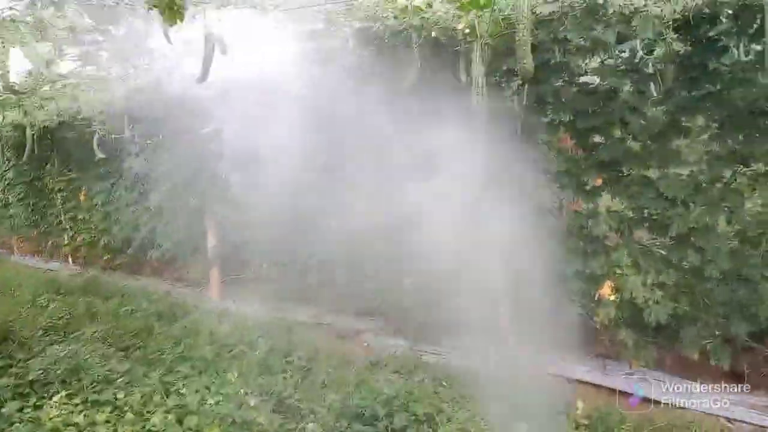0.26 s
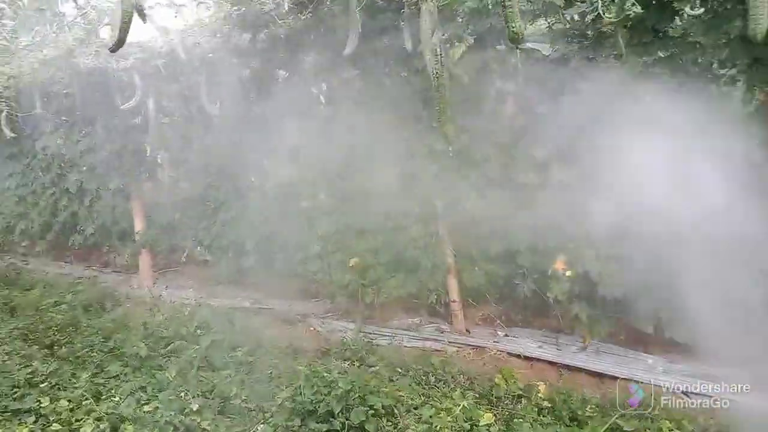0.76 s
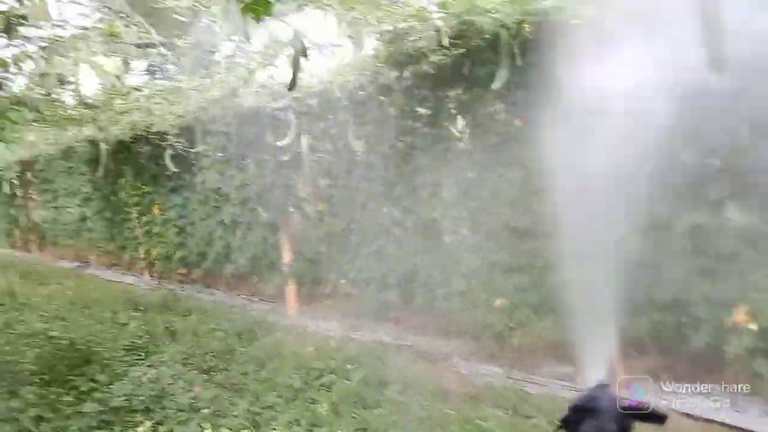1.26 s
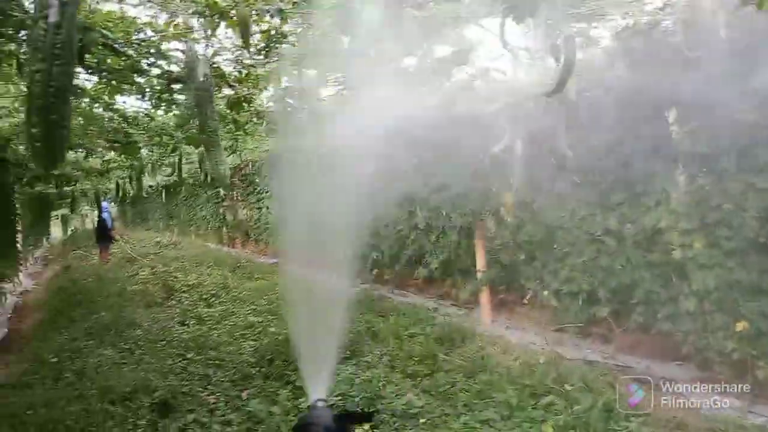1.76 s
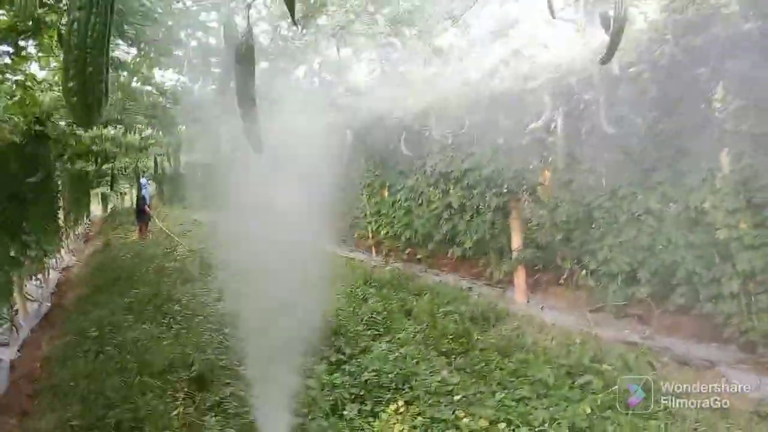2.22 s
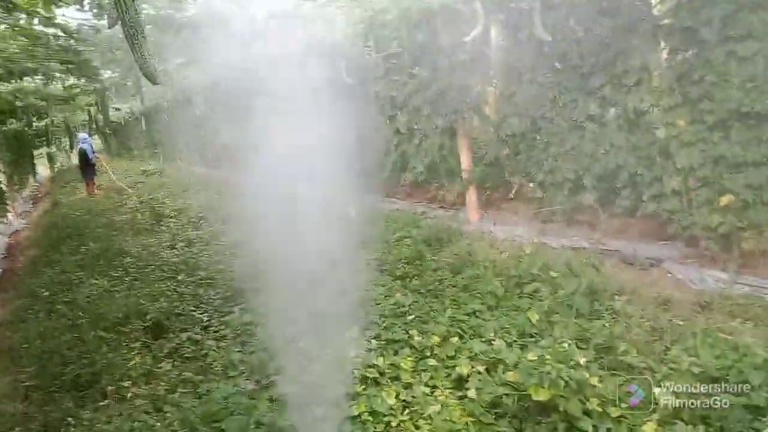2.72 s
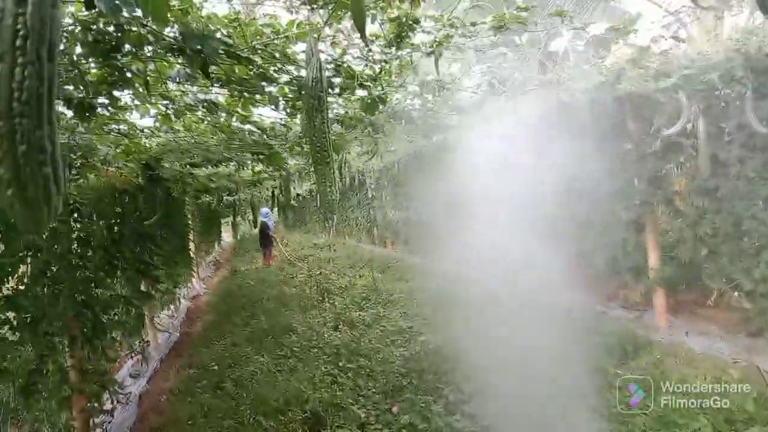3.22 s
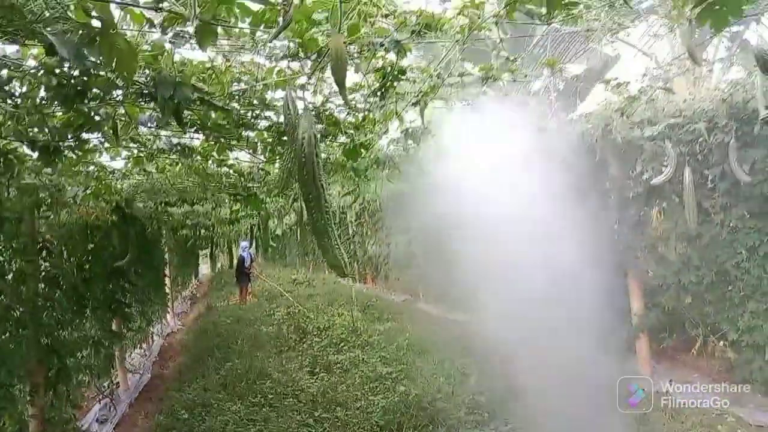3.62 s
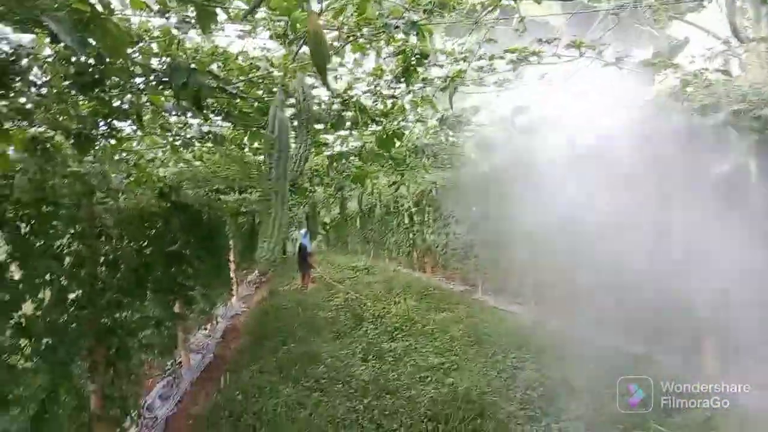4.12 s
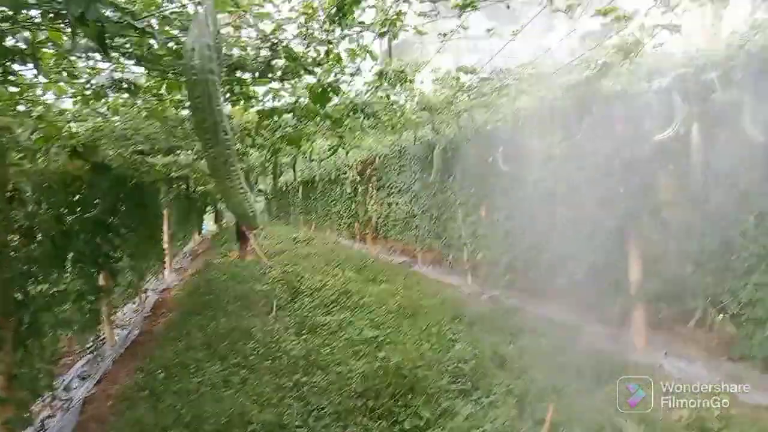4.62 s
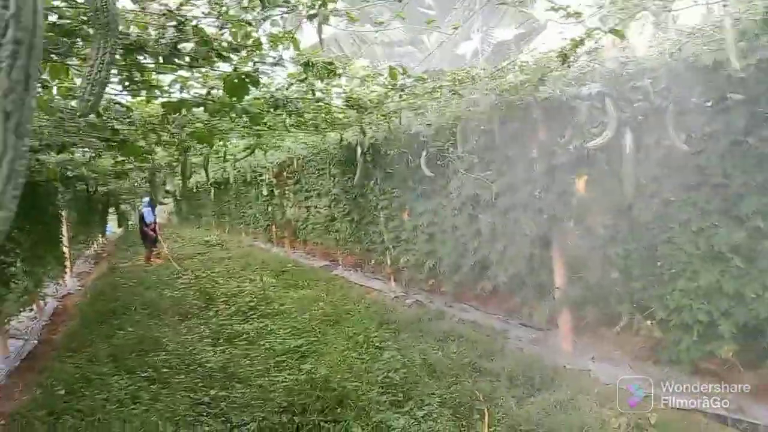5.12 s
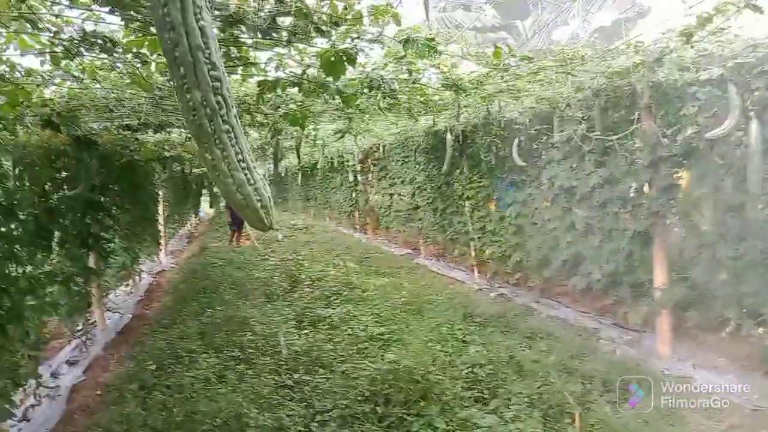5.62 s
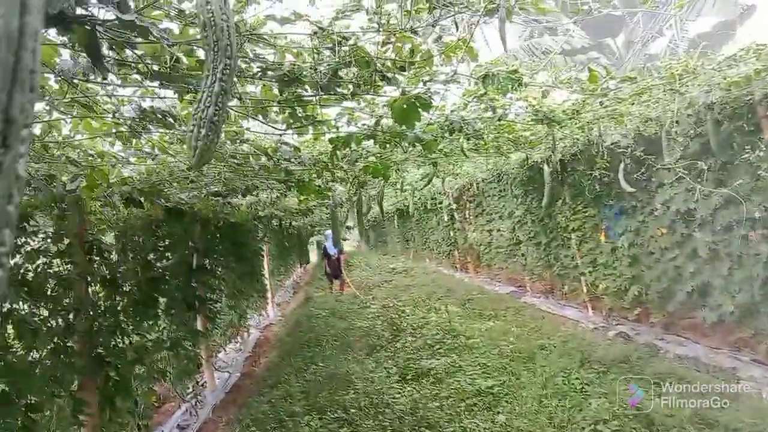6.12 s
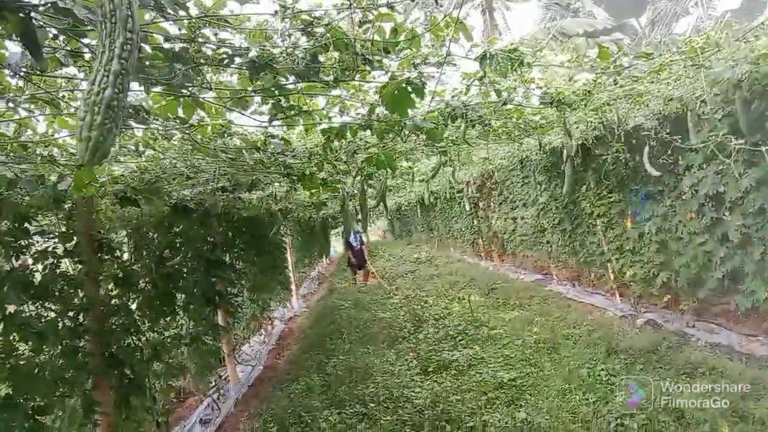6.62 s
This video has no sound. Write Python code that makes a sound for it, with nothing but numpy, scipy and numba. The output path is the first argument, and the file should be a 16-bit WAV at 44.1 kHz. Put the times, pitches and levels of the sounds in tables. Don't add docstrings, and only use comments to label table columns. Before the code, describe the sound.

A continuous jet of fine mist, very near the microphone, starts strong and peaks just after one second, drops, partly returns, then weakens after four seconds. Its airy hiss has a rough fast throb and a moving hollow tone. Beneath it are soft leaf patter, short watery plops and low wind thuds. The place is open and dry, without echo.

```python
import sys
import numpy as np
from scipy import signal
from scipy.fft import rfft, irfft
from scipy.io import wavfile
from scipy.ndimage import uniform_filter1d
from numba import njit

SR = 44100
rng = np.random.default_rng(int(sys.argv[2]) if len(sys.argv) > 2 else 0)


def magnitude_from_level(level_db):
    exponent = np.asarray(level_db, float) / 20
    return 10 ** exponent


def output_pcm(signal):
    pcm = np.clip(np.atleast_2d(signal).T, -1, 1) * 32767
    wavfile.write(sys.argv[1], SR, np.round(pcm).astype(np.int16))


N = 302967
TIME = np.arange(N) / SR
FREQ = np.arange(N // 2 + 1) * SR / N + 1


def unit(x):
    return x / np.sqrt(np.mean(x ** 2))


def curves(rows):
    s, *columns = np.transpose(rows)
    return [np.interp(TIME, s, column) for column in columns]


def colour(x, points):
    hz, db = np.transpose(points)
    gain_db = np.interp(np.log(FREQ), np.log(hz), db, left=-80, right=-80)
    return unit(irfft(rfft(x) * magnitude_from_level(gain_db), N))


def walk(rate_hz):
    hold = int(SR / rate_hz)
    steps = np.repeat(rng.standard_normal(N // hold + 1), hold)
    slewed = uniform_filter1d(uniform_filter1d(steps, hold), hold)
    return unit(slewed[:N])


def swells(peak_s, size, rise_s, fall_s, linger):
    coarse_s = TIME[::32]
    t = coarse_s - peak_s[:, None]
    rise = t / np.reshape(rise_s, (-1, 1))
    fall = -np.abs(t / np.reshape(fall_s, (-1, 1))) ** linger
    humps = size[:, None] * np.exp(np.where(t < 0, rise, fall))
    return np.interp(TIME, coarse_s, humps.sum(axis=0))


@njit
def moving_band(x, hz, k):
    band, high = np.empty(len(x)), np.empty(len(x))
    b, l = 0., 0.
    for i in range(len(x)):
        g = np.tan(np.pi * hz[i] / SR)
        v = (b + g * (x[i] - l)) / (1 + g * (g + k))
        band[i] = k * v
        high[i] = x[i] - k * v - l - g * v
        b, l = 2 * v - b, l + 2 * g * v
    return band, high


def notch(x, hz, depth_db, k, wander):
    tremor = 0.6 * walk(130) + 0.6 * walk(24)
    centre_hz = np.clip(hz * (1 + wander * tremor), 100, 0.45 * SR)
    kept = magnitude_from_level(-0.8 * np.abs(depth_db) * (1 + 0.1 * walk(30)))
    for width in (k, 0.65 * k):
        x = x - (1 - kept) * moving_band(x, centre_hz, width)[0]
    return x


def jet():
    heard = path_notches(spray())
    heard = rumble_filter(edge_resonance(heard))
    return aimed(heard)


def spray():
    # frequency in Hz, level in dB per Hz.
    jet_colour = [(500, -60), (1000, -13.5), (1450, -10), (2200, -7.5), (3300, -2.5), (4200, -13),
                  (5000, -7), (5750, -3), (6800, -8), (7700, -18), (9300, -20), (11000, -16.5),
                  (13000, -13.5), (15500, -5.5)]
    size_db = 3.0 * np.minimum(rng.exponential(size=N), 4)
    bursts = (rng.random(N) < 0.02) * magnitude_from_level(size_db) * np.sign(rng.standard_normal(N))
    hiss = rng.standard_normal(N) * magnitude_from_level(0.4 * walk(150))
    return colour(hiss + magnitude_from_level(-8) * unit(bursts), jet_colour)


def path_notches(x):
    # time in seconds, centre in Hz, depth in dB.
    first_notch = [(0, 3020, 24), (.18, 3400, 12), (.3, 3670, 8), (.64, 4230, 11.5), (.88, 4410, 10),
                   (1.08, 4700, 10), (1.29, 3790, 13), (1.45, 3700, 14), (1.63, 3440, 18), (1.9, 3190, 18),
                   (2.1, 3100, 12), (2.26, 3260, 14), (2.56, 3220, 22), (2.95, 3400, 11), (3.25, 3920, 8.5),
                   (4.0, 3930, 10.5), (4.22, 4440, 10), (4.3, 4450, 4)]
    valley = [(0, 8300, 1.5), (.25, 8000, 6.5), (1.0, 8650, 5.5), (1.45, 8150, 5), (1.7, 9600, 3.5),
              (2.2, 9700, 2), (2.4, 9700, 2.5), (2.95, 8060, 3), (3.15, 8500, 7), (4.3, 8570, 4.5),
              (4.5, 9400, 3.5), (4.75, 8800, 1), (5.2, 8300, -0.5), (5.36, 9200, 3), (6.2, 8900, 4.5),
              (6.87, 8540, 3.5)]
    third_notch = [(0, 11700, 2.5), (.35, 12600, 6), (.7, 12500, 7), (.9, 12600, -3.5), (1.4, 11200, 5.5),
                   (1.9, 11700, -1), (2.85, 11500, 3.5), (3.2, 13500, 5.5), (3.5, 13200, 10),
                   (4.05, 13500, 4), (4.17, 15200, 8), (4.35, 14000, .3), (4.6, 12500, -0.5),
                   (5.0, 12500, .1), (5.35, 12600, 4), (5.7, 12100, 2), (6.1, 12100, 5), (6.87, 11900, 2)]
    upper_notch = [(0, 14000, 6), (.25, 14300, 3.5), (.7, 14600, 8), (.87, 15400, 11), (1.1, 15500, 5.5),
                   (1.7, 14700, 3), (1.95, 13800, 0), (2.3, 14300, 3), (2.95, 14500, 4), (3.12, 14500, 0),
                   (6.87, 14500, 2.5)]
    first_hz, first_db = curves(first_notch)
    long_way = np.clip((3700 - first_hz) / 550, 0, 1)
    x = notch(x, first_hz, first_db, 0.56, 0.018)
    x = notch(x, 2890 + 0.97 * first_hz, 5.5 * long_way, 0.3, 0.01)
    x = notch(x, np.full(N, 8000.0), 2 * long_way, 0.2, 0.01)
    x = notch(x, *curves(valley), 0.38, 0.01)
    x = notch(x, *curves(third_notch), 0.3, 0.015)
    return notch(x, *curves(upper_notch), 0.35, 0.01)


def edge_resonance(x):
    # time in seconds, centre in Hz, gain in dB.
    rim = [(0, 1520, 3.5), (1.2, 1550, -0.3), (1.6, 1510, 3.5), (2.8, 1530, 4), (3.2, 1300, 3),
           (4.0, 1320, 2.5), (4.4, 1500, 0.3), (5.5, 1500, -3), (6.87, 1340, 1.5)]
    rim_hz, rim_db = curves(rim)
    return x + (magnitude_from_level(rim_db) - 1) * moving_band(x, rim_hz, 0.46)[0]


def rumble_filter(x):
    # time in seconds, corner in Hz.
    low_edge = [(0, 1200), (.7, 1120), (1.35, 1090), (1.85, 1170), (2.85, 1240), (3.1, 1097), (3.95, 1105),
                (4.2, 1206), (4.7, 1300), (4.9, 1220), (5.35, 1165), (5.75, 1210), (6.3, 1200),
                (6.87, 1095)]
    corner_hz = curves(low_edge)[0] * (1 + 0.03 * walk(9.7))
    for k in (1.37, 1.21, 0.81, 0.32):
        x = moving_band(x, 1.085 * corner_hz, k)[1]
    return x - 0.79 * moving_band(x, 0.95 * corner_hz, 0.28)[0]


def aimed(x):
    edges_hz = [4035, 7260, 10900]
    # level over nearness in dB, dB per dB of facing, dB per dB of aim, share of a shade.
    regions = [
        (-0.21, 0.06, 0.31, 0.97),
        (7.5, 0.8, 0, 0.84),
        (-6.5, .1, -0.2, 0.62),
        (1.5, 0.53, 1.5, 1.3),
    ]
    # time in seconds, strokes per second, throb share 0-1.
    pump = [(0.0, 33.93, 0.1), (0.62, 36.63, 0.13), (1.25, 34.95, 0.13), (1.87, 36.45, 0.05),
            (2.5, 35.23, 0.07), (3.12, 35.04, 0.14), (3.75, 35.77, 0.09), (4.37, 35.54, 0.11),
            (5.0, 36.56, 0.08), (5.62, 36.94, 0.16), (6.25, 37.14, 0.15), (6.87, 37.27, 0.14)]
    throb_shares = [1.22, 1.05, 0.27, 0.42]
    rate_hz, throb = curves(pump)
    stroke = np.cos(2 * np.pi * (0.14 + np.cumsum(rate_hz) / SR))
    near_db, *turns_db = gun()
    below = [0] + [1 / (1 + (FREQ / hz) ** 12) for hz in edges_hz] + [1]
    spectrum = rfft(x)
    out = np.zeros(N)
    for i, (over_db, *gains) in enumerate(regions):
        region = unit(irfft(spectrum * (below[i + 1] - below[i]), N))
        level_db = near_db + over_db + np.dot(gains, turns_db) + 0.64 * walk(25.01)
        out += region * magnitude_from_level(level_db) * (1 + 1.34 * throb_shares[i] * throb * stroke)
    return out


def gun():
    # time in seconds, nearness in dB, facing the port in dB, aim along the phone in dB.
    sweep = [(0, -30, -0.5, -2.5), (.36, -29.5, 3.5, 0.5), (.8, -29, -0.4, 0.5), (1.1, -28, -1.1, 1.5),
             (1.3, -27.5, -1.1, 1.2), (1.42, -32, -2, 1), (1.75, -35.3, -1.5, -3), (1.96, -32.5, -.4, -2.5),
             (2.94, -30.5, 0.3, -1.5), (3.1, -30.5, 1.3, -0.2), (3.55, -30.5, 3, -0.6),
             (4.06, -30.5, 1.1, -0.5), (4.3, -31, -3, 4.4), (4.62, -32.5, 1, -3.5), (5.05, -34, 4.5, 2),
             (5.68, -35, -2.5, 4), (6.05, -35, 0.1, 2.5), (6.87, -35.5, -0.2, 3.5)]
    # time in seconds, loss in dB, recovery in seconds.
    shades = [
        (1.35, 2, 0.045),
        (4.395, 8.5, 0.083),
        (5.262, 2.5, 0.23),
    ]
    s, loss_db, back_s = np.transpose(shades)
    shade_db = -swells(s, loss_db, 0.0093, back_s, linger=2.05)
    return curves(sweep) + [shade_db]


def spits():
    # time in seconds, peak in dB.
    snaps = [
        (4.4005, -6),
        (4.4295, -11),
    ]
    out = np.zeros(N)
    for s, db in snaps:
        t = TIME - s
        out += magnitude_from_level(db) * np.exp(-(t / 0.00008) ** 2) * np.sin(2 * np.pi * 13500 * t)
    return out


def leaves(level_db):
    # frequency in Hz, level in dB per Hz.
    leaf_colour = [(120, -17), (200, -4.5), (493, -9), (828, -1), (1000, 0), (1300, 1), (2200, -120)]
    patter = rng.standard_normal(N) * magnitude_from_level(1.6 * walk(40))
    return colour(patter, leaf_colour) * magnitude_from_level(level_db + 2.5)


def plops():
    # time in seconds, pitch in Hz, level in dB.
    drops = [(0.051, 1063, -47), (.2, 698, -49.5), (.32, 680, -49), (0.645, 957, -49), (.82, 720, -52),
             (0.969, 327, -49.5), (1.1, 404, -58), (1.11, 950, -46), (1.23, 550, -49), (1.259, 965, -49),
             (1.278, 1086, -42), (1.3, 665, -45), (1.37, 790, -50), (1.6, 725, -51.5), (1.78, 706, -52.5),
             (2.43, 990, -46), (2.75, 950, -45), (2.84, 916, -47), (3.001, 1170, -41.5), (3.19, 1178, -41),
             (3.359, 877, -54), (3.87, 464, -57), (4.87, 1273, -45), (5.159, 355, -59), (5.6, 980, -53),
             (6.278, 1070, -60), (6.82, 1087, -47)]
    # time in seconds, level in dB.
    thumps = [
        (1.249, -42),
        (2.21, -40),
        (3.148, -39),
        (3.848, -44.5),
        (5.232, -50),
    ]
    events = [(s, hz, db, 0.061) for s, hz, db in drops]
    events += [(s, 133, db, 0.08) for s, db in thumps]
    out = np.zeros(N)
    sway = walk(260) + 1j * walk(260)
    for s, hz, db, length_s in events:
        near = slice(max(int((s - 2 * length_s) * SR), 0), int((s + 2 * length_s) * SR))
        t = TIME[near] - s
        noisy = 0.6 + min(hz / 900, 0.8) * sway[near]
        ring = noisy * np.exp(2j * np.pi * hz * t)
        out[near] += magnitude_from_level(db + 0.5) * np.exp(-(1.75 * t / length_s) ** 2) * ring.real
    return out


def wind(level_db):
    # frequency in Hz, level in dB per Hz.
    wind_colour = [(13, -46), (22, -11), (38, -21), (65, 2.5), (129, 3), (198, -4), (300, -16), (390, -17),
                   (660, -120)]
    return colour(rng.standard_normal(N), wind_colour) * magnitude_from_level(level_db + 1.0 * walk(24.96) - 0.8)


def gusts():
    # time of the peak in seconds, level in dB, build-up in seconds.
    puffs = [(.25, -63, .1), (.64, -52.5, 0.31), (.73, -48, 0.029), (.87, -50.5, 0.067), (1.11, -50, 0.11),
             (1.24, -43.5, 0.033), (1.43, -60, .05), (1.77, -58, 0.14), (1.97, -60, 0.071),
             (2.22, -50, 0.079), (2.39, -51, 0.079), (2.62, -58, 0.13), (2.87, -57, 0.076),
             (3.15, -50.5, 0.17), (3.38, -62, .15), (3.56, -58, 0.076), (3.84, -50.5, 0.063),
             (4.06, -53.5, 0.13), (4.36, -56, 0.1), (4.59, -64, .1), (4.71, -62, .05), (4.95, -50, 0.064),
             (5.23, -48, 0.043), (5.49, -66, .07), (5.78, -59.5, .15), (6.09, -65, 0.056), (6.49, -61, .07),
             (6.74, -63, 0.066), (6.87, -58, .04)]
    calm_db, fall_s = -71, 0.03
    s, db, rise_s = np.transpose(puffs)
    return 20 * np.log10(magnitude_from_level(calm_db) + swells(s, magnitude_from_level(db), rise_s, fall_s, linger=0.65))


def scene():
    near_db, _, _, shade_db = gun()
    wind_db = gusts()
    leaf_db = -57.5 + (near_db - near_db.mean()) + 0.55 * shade_db
    leaf_db = leaf_db + 0.073 * (wind_db - wind_db.mean())
    mix = jet() + spits() + leaves(leaf_db) + plops() + wind(wind_db)
    return mix[None]


def top_cut(x):
    return signal.sosfilt(signal.butter(12, 16860, fs=SR, output="sos"), x)


def record(dry):
    top_hz = 15550
    mix = irfft(rfft(dry) * (FREQ < top_hz), N)
    return top_cut(mix)


dry = scene()
out = record(dry)
output_pcm(out)
```